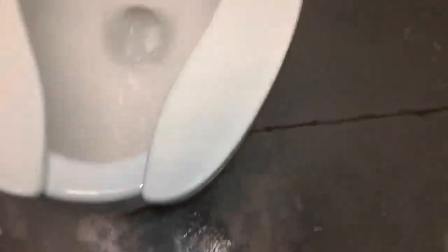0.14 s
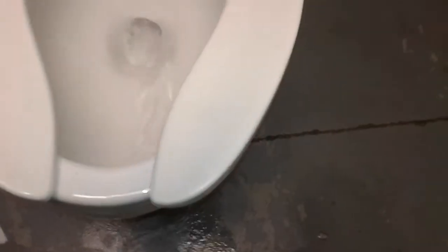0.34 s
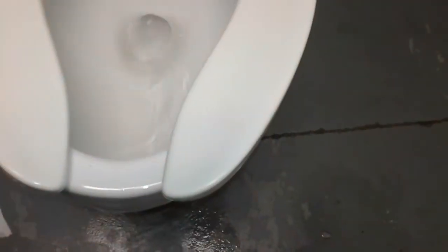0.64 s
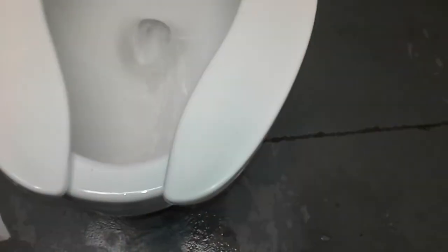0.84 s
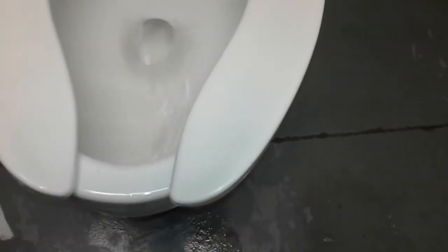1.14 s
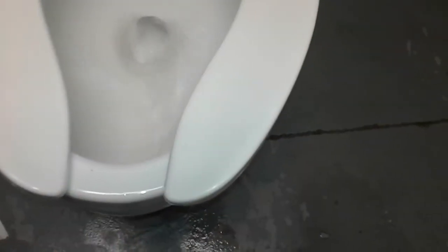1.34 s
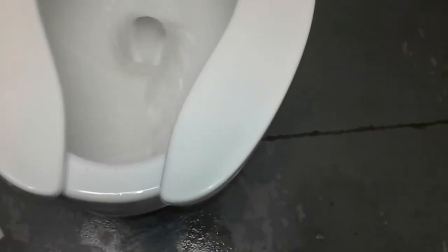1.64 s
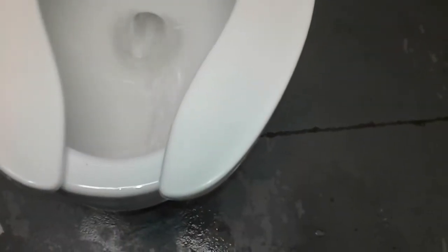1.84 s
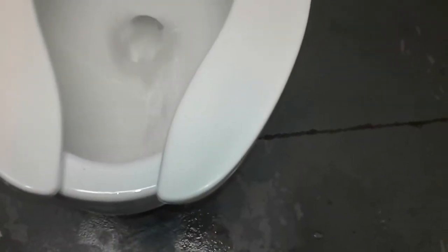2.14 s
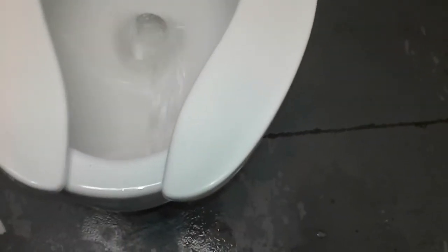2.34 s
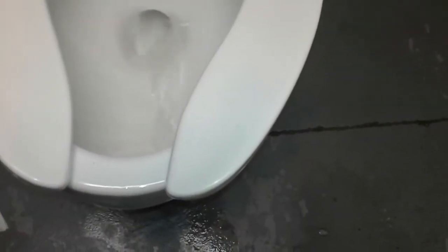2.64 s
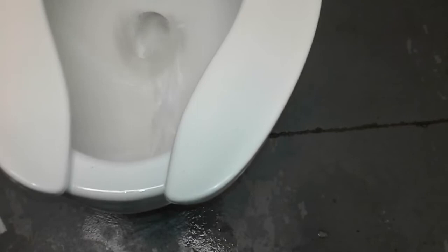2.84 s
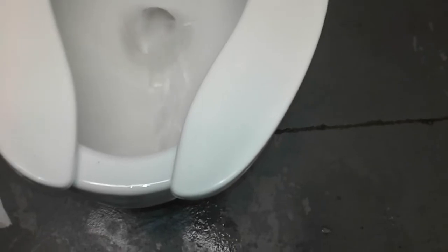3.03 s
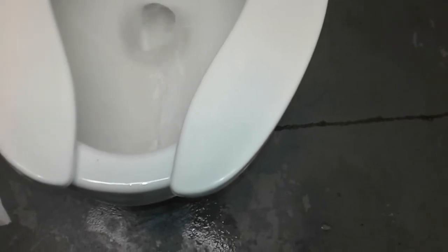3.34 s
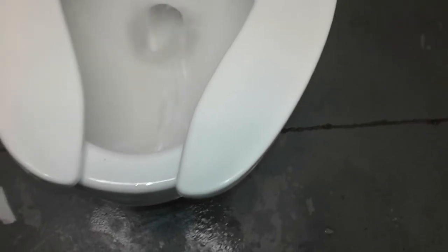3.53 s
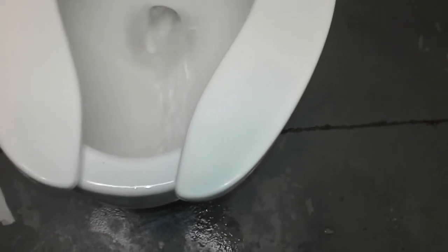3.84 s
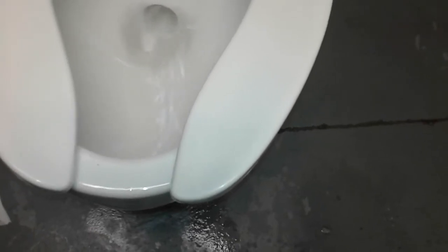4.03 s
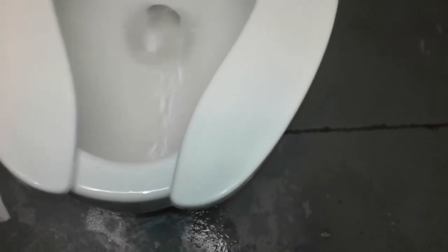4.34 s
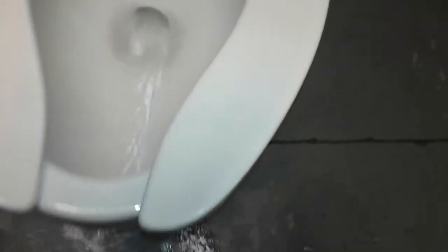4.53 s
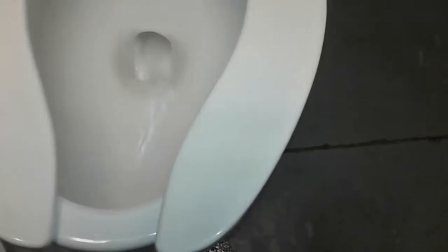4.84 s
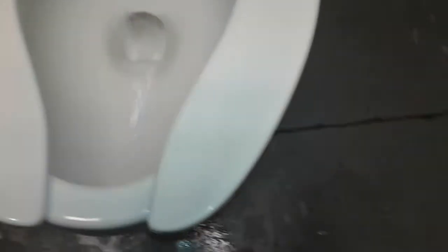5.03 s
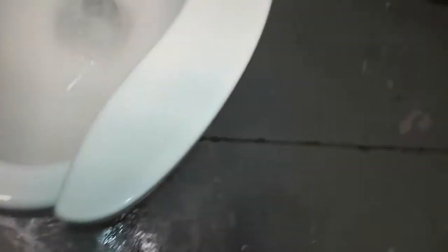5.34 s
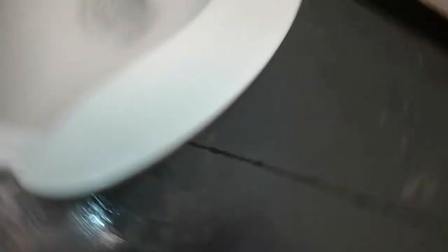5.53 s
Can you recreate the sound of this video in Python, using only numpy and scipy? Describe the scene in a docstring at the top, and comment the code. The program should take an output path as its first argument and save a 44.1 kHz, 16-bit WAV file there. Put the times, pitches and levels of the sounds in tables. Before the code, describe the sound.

The tail of a strong flush, heard from just over the bowl: steady hissing water full of crackling, airy spurts, splashes on porcelain and small wet gulps. It thins in stages, with spurts standing out more clearly and a loud spit just before the end. After about five seconds it drops to a near-quiet slosh, with short bright tile echo and very faint low rumble.

```python
"""A pressure-fed toilet flushes in a tiled restroom, with the microphone just above the bowl.
Aerated water hisses and sputters from the rim: coloured noise and volleys of tiny ringing bubbles.
It splashes in the bowl and gulps in the drain, as bursts and bubbles coloured by resonances.
The spurts weaken and thin out as the valve closes, with sharp spits among them.
The trap gives a last faint gulp and the water settles; tile echo, pipe hum and low rumble lie behind."""
import sys
import numpy as np
from scipy import signal
from scipy.fft import rfft, irfft, next_fast_len
from scipy.io import wavfile
from scipy.ndimage import map_coordinates

SR = 44100
rng = np.random.default_rng(int(sys.argv[2]) if len(sys.argv) > 2 else 0)


def wav_out(sig):
    """Save sig, one row per channel (or a flat mono array), as 16-bit PCM at SR to the path in sys.argv[1]."""
    wavfile.write(sys.argv[1], SR, np.round(np.clip(np.atleast_2d(sig).T, -1, 1) * 32767).astype(np.int16))


N = 251370
TIME = np.arange(N) / SR  # seconds

# Flow through the rim, dying as the valve closes. Each row: time in seconds, level in dB.
RIM_FLOW = [(0.0, -15.5), (1.3, -18), (1.62, -19.5), (2.81, -19), (3.19, -22.5), (3.41, -22.5),
            (3.59, -19.5), (3.76, -20.5), (4.51, -25), (5.03, -31.5), (5.27, -44), (5.7, -46.5)]
# How hard the water lands in the bowl. Each row: time in seconds, level in dB.
BOWL_POUR = [(0.0, -28), (0.3, -29), (0.7, -26.5), (1.14, -30), (1.65, -29), (1.95, -33), (2.87, -31.5),
             (3.21, -34), (3.4, -36.5), (3.73, -33), (4.97, -41), (5.3, -48), (5.7, -52.5)]
# Big spurts of air and water from the rim.
# Each row: start in seconds, relative level in dB, nominal length in seconds, ring pitch in Hz.
BIG_SPURTS = [(0.038, -15.5, 0.015, 6600), (0.188, -27, 0.026, 5900), (0.44, -17, 0.013, 4660),
              (0.486, -12, 0.02, 6000), (0.699, -11.5, 0.0096, 5730), (0.811, -12, 0.029, 6350),
              (1.1205, -9.5, 0.0047, 5670), (1.152, -12.5, 0.03, 6100), (1.21, -18, 0.012, 6260),
              (1.292, -13.5, 0.033, 6100), (1.403, -13.5, 0.06, 6150), (1.483, -14, 0.034, 6000),
              (1.757, -15, 0.0048, 5500), (1.781, -16.5, 0.008, 4800), (1.816, -21, 0.0063, 6500),
              (1.883, -14, 0.0098, 6060), (2.004, -13, 0.015, 5970), (2.201, -15.5, 0.026, 5250),
              (2.405, -14.5, 0.027, 5500), (2.319, -16, 0.03, 6600), (2.613, -15, 0.045, 6100),
              (2.675, -14, 0.016, 6250), (2.709, -23, 0.0077, 6750), (2.751, -14.5, 0.016, 5270),
              (2.845, -13.5, 0.027, 5840), (2.886, -17, 0.016, 5400), (2.9224, -13, 0.0061, 4700),
              (2.969, -13, 0.022, 5800), (3.054, -13, 0.005, 5400), (3.092, -16.5, 0.012, 5000),
              (3.198, -16.5, 0.032, 5330), (3.348, -12, 0.03, 5830), (3.415, -15, 0.038, 5800),
              (3.4814, -12.5, 0.0057, 5830), (3.523, -13, 0.0098, 6270), (3.574, -12, 0.017, 6500),
              (3.603, -11.5, 0.014, 6500), (3.705, -13, 0.022, 6560), (3.768, -11, 0.014, 6670),
              (3.8425, -11.5, 0.008, 5800), (3.858, -13, 0.015, 5900), (3.897, -19, 0.0047, 6100),
              (3.951, -14, 0.02, 6360), (4.042, -12.5, 0.033, 6000), (4.134, -15.5, 0.007, 5200),
              (4.161, -12, 0.022, 5900), (4.286, -13.5, 0.041, 6000), (4.391, -12.5, 0.012, 6080),
              (4.452, -13.5, 0.0065, 5540), (4.468, -12.5, 0.014, 6300), (4.577, -19.5, 0.017, 6560),
              (4.692, -20.5, 0.01, 5500), (4.73, -20, 0.01, 5900), (4.782, -20.5, 0.019, 6630),
              (4.911, -21.5, 0.0074, 6300), (5.012, -23, 0.0067, 6400), (5.106, -25, 0.066, 6100)]
# Single air pockets that burst. Each row: start in seconds, relative level in dB, pitch in Hz.
AIR_SPITS = [(3.4138, -6, 4650), (3.6853, -9, 5000), (4.66, -0.5, 5900), (4.7840, -7, 6400),
             (4.8906, -5, 4840)]
# Gulps and plops of air. Each row: start in seconds, relative level in dB, pitch in Hz,
# width in octaves, time to fall 60 dB in seconds.
AIR_GULPS = [(0.0, -16.5, 269, 0.25, 0.06), (.012, -26, 591, 0.57, 0.21), (.125, -33, 635, 0.7, 0.73),
             (0.22, -27.5, 397, 0.72, 0.29), (0.249, -29.5, 338, 0.59, 0.17), (.27, -26, 893, 0.47, 0.24),
             (0.299, -18.5, 3400, 0.15, 0.093), (0.302, -21.5, 2240, 0.42, 0.17),
             (.45, -31, 1943, 0.061, 0.95), (.62, -21.5, 2200, 0.7, 0.16), (1.57, -23.5, 2570, 0.25, 0.15),
             (1.715, -28, 1490, 0.9, 0.17), (3.5, -32.5, 526, 1.06, 0.23), (3.575, -31, 1865, 0.11, 0.35),
             (4.453, -19.5, 2910, 0.56, 0.074), (4.659, -36, 2310, 0.16, 0.26),
             (4.795, -30.5, 2700, 0.22, 0.19), (4.842, -35, 1230, 0.55, 0.091),
             (4.918, -32.5, 2390, 0.18, 0.18), (4.983, -28, 4260, 0.37, 0.089),
             (5.006, -37.5, 2720, 0.16, 0.2), (5.082, -35, 868, 1.64, 0.56),
             (5.42, -50.5, 548, 0.028, 0.69)]
# Soft low bumps. Each row: start in seconds, relative level in dB.
LOW_BUMPS = [(0.698, -35), (1.119, -44)]
# Swells of low rumble. Each row: time of the peak in seconds, its level in dB.
RUMBLE_SWELLS = [(0.0, -51), (3.52, -50.5), (5.2, -52), (5.56, -55)]
# Swells of the pipe's hum. Each row: time of the peak in seconds, its level in dB.
HUM_SWELLS = [(1.8, -49.5), (3.12, -58), (3.54, -51.5)]

# Resonances of the air in the bowl. Each row: frequency in Hz, width in Hz, relative strength in dB.
BOWL_MODES = [(902, 38, 5.5), (1288, 97, 6.5), (1438, 11, 7.5), (1920, 105, 4.5), (2310, 270, -2.5),
              (2828, 28, 1)]
# Resonances of the trap. Each row: frequency in Hz, width in Hz, relative strength in dB.
TRAP_MODES = [(253.5, 14.3, 1.5), (310, 53, -1.5), (457, 93, -2.5), (620, 19.4, 6)]
# Decay of the tiled room. Each row: frequency in Hz, time to fall 60 dB in seconds.
TILE_DECAY = [(150, 0.11), (1000, 0.68), (5000, 0.82), (12000, 0.033)]

# Spectra of rim hiss, mist, spurts, splash, drain, settling water and room rumble.
# Each row: frequency in Hz, relative level in dB per Hz.
HISS_SPECTRUM = [(1000, -40), (2500, -10), (3600, -9), (4400, -1.5), (5100, -1), (5750, 5.5), (6150, 9.5),
                 (6700, 4.5), (7300, -1.5), (8000, -10.5), (10000, -16.5), (13500, -38)]
MIST_SPECTRUM = [(5000, -22), (7500, 7), (9000, 3.5), (11000, -0.5), (12500, -4), (13800, -10.5)]
SPURT_SPECTRUM = [(1000, -62), (2500, -21.5), (3600, -13), (4400, -6), (5100, -3), (5750, 5), (6200, 5),
                  (6700, 3), (7300, -3.5), (8000, -9.5), (10000, -19), (13500, -30)]
SPLASH_SPECTRUM = [(300, -20), (700, -8.5), (1200, -8.5), (1650, -3), (2000, -0.5), (3000, 5), (4200, 3),
                   (7000, -45)]
DRAIN_SPECTRUM = [(40, -45), (120, -24), (190, -8.5), (240, -2), (400, -7), (700, -3.5), (1100, 2),
                  (2500, -49)]
SETTLE_SPECTRUM = [(120, -20), (210, -2.5), (330, 1), (450, -6), (560, -0.5), (1100, -6.5), (1450, -3),
                   (1800, -7), (4000, -29), (9000, -44)]
RUMBLE_SPECTRUM = [(20, -22), (38, -14), (58, -6), (90, -16), (200, -11), (600, -35)]

HISS_DB, MIST_DB = -0.5, -11  # hiss against the flow; offset of the mist
MIST_GROWS, MIST_FULL_DB = 1.093, -18.5  # mist dB per dB of flow; flow above which it grows no more
SPLASH_DB, SLAP_DB = -4, 3.5  # steady splash against the pour; a spurt's slap against that
DRAIN_DB, DRAIN_GROWS = -25.5, 0.61  # offset of the drain; its dB per dB of pour
SMALL_PER_S = 13  # small spurts a second, before those close to a big one are left out
SMALL_DB, SMALL_SCATTER_DB = -0.5, 5.5  # level against the flow; its scatter
SMALL_LENGTH_S, SMALL_HZ, SMALL_SCATTER_HZ = 0.015, 5900, 302  # typical length; ring; its scatter
SHUT_S = 5.08  # the valve shuts
TOP_HZ = 13900  # the recorder's band limit


def amp(db):
    """Decibels to gain."""
    return 10 ** (np.asarray(db) / 20)


def unit(x):
    """Scale to rms 1."""
    return x / np.sqrt(np.mean(x ** 2) + 1e-20)


def along(points, hz):
    """Read (Hz, value) points on a log frequency axis."""
    f, v = np.transpose(points)
    return np.interp(np.log(hz + 1), np.log(f + 1), v)


def flow_at(s):
    """The flow in dB at time s."""
    return np.interp(s, *np.transpose(RIM_FLOW))


def add(track, s, sound):
    """Mix a sound into a track at time s."""
    start = min(max(round(s * SR), 0), N)
    track[start:start + len(sound)] += sound[:N - start]


def wobble(rate):
    """A smooth random curve of rms 1, with rate knots a second."""
    knots = rng.standard_normal(N // 8)
    return unit(map_coordinates(knots, [TIME * rate], order=3, mode="wrap"))


def surges(rate, life_s, spread_db):
    """An envelope of rms 1: rate random surges a second, each starting at once and dying away."""
    chance, size = rng.random((2, N))
    power = (chance < rate / SR) * amp(spread_db * size) ** 2
    decay = np.exp(-2 / (life_s * SR))
    # run twice, so that the surges are already under way at the start
    running = signal.lfilter([1], [1, -decay], np.tile(power, 2))[N:]
    return unit(np.sqrt(running))


def swells(rows, rest_db, rise_s, fall_s):
    """A resting level from which each (s, peak dB) row rises and falls away."""
    peaks = 0
    for s, db in rows:
        distance = np.maximum((s - TIME) / rise_s, (TIME - s) / fall_s)
        peaks = peaks + amp(db) * np.exp(-distance)
    return np.hypot(amp(rest_db), peaks)


def coloured(x, gain):
    """Causal minimum-phase filter with the shape of gain; white noise keeps its power."""
    size = 2 * next_fast_len(len(x) // 2 + 8192)
    shape = unit(gain(np.fft.rfftfreq(size, 1 / SR)))
    cepstrum = irfft(np.log(shape + 1e-6))
    # folding the cepstrum onto positive time makes the filter causal
    cepstrum[1:size // 2] *= 2
    cepstrum[size // 2 + 1:] = 0
    return irfft(rfft(x, size) * np.exp(rfft(cepstrum)))[:len(x)]


def body(spectrum, modes=(), ring_db=0):
    """Gain of a broad spectrum with resonances standing on it."""
    def gain(f):
        peaks = sum(amp(db + ring_db) ** 2 / (1 + (2 * (f - hz) / width) ** 2)
                    for hz, width, db in modes)
        return amp(along(spectrum, f)) * np.sqrt(1 + peaks)
    return gain


def crackle(rate, life_s, spread_db):
    """Noise of rms 1 made of tiny bursts of unequal size."""
    return unit(rng.standard_normal(N) * surges(rate, life_s, spread_db))


def bubbles(count, low_hz, high_hz, cycles, spread_db):
    """A cloud of bubbles of rms 1; each rings for a few cycles and rises in pitch."""
    when, pitch, size = rng.random((count, 3)).T[:, :, None]
    hz = low_hz * (high_hz / low_hz) ** pitch
    n = np.arange(int(2 * SR * cycles / low_hz))
    age = n / SR * hz / cycles  # in decay lifetimes
    tone = np.sin(2 * np.pi * cycles * age * (1 + 0.032 * age))
    ring = tone * np.exp(-age) * (1 - np.exp(-8 * age))
    ring = ring * amp(spread_db * size) * np.sqrt(hz)
    places = (when * N).astype(int) + n
    return unit(np.bincount(places.ravel(), ring.ravel(), N)[:N])


def spray(flow_db, waver_db=1.33):
    """Aerated water hisses from the rim holes near 6 kHz in small surges, under a wavering mist."""
    cloud = bubbles(count=9000, low_hz=2978, high_hz=8810, cycles=7.3, spread_db=21)
    grains = unit(rng.standard_normal(N) + 0.5 * cloud)
    flutter = unit(np.hypot(.8, surges(rate=70, life_s=0.036, spread_db=0.5)))
    hiss = amp(flow_db + HISS_DB) * flutter * unit(coloured(grains, body(HISS_SPECTRUM)))
    mist_db = MIST_DB + MIST_GROWS * np.minimum(flow_db, MIST_FULL_DB) + waver_db * wobble(rate=12)
    fizz = coloured(crackle(rate=690, life_s=0.0092, spread_db=8), body(MIST_SPECTRUM))
    return hiss + amp(mist_db) * fizz


def choke(depth=0.19, gather_s=0.012):
    """Air gathering in the rim chokes the stream just before each big spurt."""
    blocked = np.zeros(N)
    plug = np.exp(-np.arange(SR // 20)[::-1] / (gather_s * SR))
    for s, *_ in BIG_SPURTS:
        add(blocked, s - len(plug) / SR, plug)
    return 1 - np.clip(depth * blocked, 0, .9)


def bowl_splash(pour_db, spurts, refill_s=4.77, rise=1.15, slap_t60=0.17, slap_grows=0.27):
    """Water hits porcelain and pool, each spurt with a slap; the bowl rings higher once it refills."""
    slaps, t = np.zeros(N), np.arange(SR // 5) / SR
    for s, db, *_ in spurts:
        slap_db = SLAP_DB + slap_grows * (db - flow_at(s))
        add(slaps, s, amp(slap_db - 60 * t / slap_t60))
    spatter = crackle(rate=230, life_s=0.016, spread_db=4.5)
    plinks = bubbles(count=3000, low_hz=882.0, high_hz=4070, cycles=9.7, spread_db=21)
    drops = unit(spatter + amp(-11.5) * plinks)
    pour = amp(pour_db + SPLASH_DB) * np.hypot(1, slaps) * drops
    empty = body(SPLASH_SPECTRUM, BOWL_MODES, ring_db=6.5)
    full = np.clip((TIME - refill_s) / 0.44, 0, 1)  # crossfade from empty to refilled
    return (1 - full) * coloured(pour, empty) + full * coloured(pour, lambda f: empty(f / rise))


def drain(pour_db):
    """Water churns and gurgles down the trap: bursts ringing its resonances, and low bubbles."""
    bursts = crackle(rate=150, life_s=0.022, spread_db=20)
    churn = unit(coloured(bursts, body(DRAIN_SPECTRUM, TRAP_MODES, ring_db=8.5)))
    gurgle = bubbles(count=400, low_hz=227.3, high_hz=902, cycles=7.0, spread_db=29)
    return amp(DRAIN_DB + DRAIN_GROWS * pour_db) * (churn + amp(-11) * gurgle)


def gulps(count=90, cycles=7, ring_db=-5, attack_cycles=1.34):
    """An air pocket collapses with a wet slap and a cluster of ringing bubbles around one pitch."""
    track, t = np.zeros(N), np.arange(SR // 2) / SR
    for s, db, hz, octaves, t60 in AIR_GULPS:
        fading = amp(-60 * t / t60) * (1 - np.exp(-t * hz / attack_cycles))
        band = lambda f: 1 / (1 + (np.log2((f + 1) / hz) / octaves) ** 4)
        slap = fading * coloured(rng.standard_normal(SR), band)[-len(t):]
        pitch = hz * 2 ** (octaves * rng.uniform(-1.1, 1, (count, 1)))
        # the bubbles are born one after another over half the decay
        born = t60 / 2 * (np.arange(count)[:, None] + rng.random((count, 1))) / count
        age = np.maximum(t[:int(.7 * t60 * SR)] - born, 0) * pitch / cycles
        tone = np.sin(2 * np.pi * cycles * age * (1 + 0.023 * age))
        ring = tone * np.exp(-age) * (1 - np.exp(-6 * age))
        cluster = (amp(-60 * born / t60) * ring).sum(0)
        strength = amp(db) * np.linalg.norm(fading)
        add(track, s, strength * slap / np.linalg.norm(slap))
        add(track, s, strength * amp(ring_db) * cluster / np.linalg.norm(cluster))
    return track


def ambience():
    """Faint low rumble in the room, which swells now and then."""
    low_cut = lambda f: 1 / np.sqrt(1 + (42 / (f + 1)) ** 8)
    boom = lambda f: amp(along(RUMBLE_SPECTRUM, f)) * low_cut(f)
    level = swells(RUMBLE_SWELLS, rest_db=-77, rise_s=.04, fall_s=0.11)
    return level * coloured(rng.standard_normal(N), boom)


def pipe_hum(hum_hz=127, width_hz=11):
    """The flow unsteadily excites one low resonance of the supply pipe."""
    mode = lambda f: 1 / (1 + (2 * (f - hum_hz) / width_hz) ** 2)
    level = swells(HUM_SWELLS, rest_db=-71, rise_s=0.048, fall_s=0.15)
    return level * unit(coloured(rng.standard_normal(N), mode))


def room(x):
    """The tiles answer 5 ms later with a tail in which each frequency dies at its own speed."""
    hz, t, z = signal.stft(rng.standard_normal(SR // 2), SR, nperseg=256)
    fading = amp(-60 * t / along(TILE_DECAY, hz)[:, None])
    tail = signal.istft(z * fading, SR, nperseg=256)[1]
    delayed = np.pad(x, (SR // 200, 0))
    return signal.fftconvolve(delayed, tail / np.linalg.norm(tail))[:N]


def rim_is_free(s, before_s=0.031, after_s=.025):
    """No small spurt escapes while a big one gathers or bursts."""
    return all(not start - before_s < s < start + after_s for start, *_ in BIG_SPURTS)


def small_spurts(count=130, regularity=2.5):
    """Spurts at uneven intervals that follow the flow, as rows like the big ones."""
    # a weighted sum of three random waits is more even than a single one
    waits = rng.exponential(size=(count, 3)) @ [regularity, 1, 1]
    s = np.cumsum(waits) / (regularity + 2) / SMALL_PER_S
    size, stretch, pitch = np.clip(rng.standard_normal((count, 3)).T, -2, 2)
    level_db = flow_at(s) + SMALL_DB + SMALL_SCATTER_DB * size
    length = SMALL_LENGTH_S * 2 ** (stretch / 2)
    rows = np.transpose([s, level_db, length, SMALL_HZ + SMALL_SCATTER_HZ * pitch])
    return [row for row in rows if row[0] < SHUT_S and rim_is_free(row[0])]


def spurt_shape(length, fall_s=0.0026, pop=0.87, pop_s=0.006):
    """A spurt starts with a pop, sags while it lasts and then collapses."""
    t = np.arange(SR // 10) / SR
    collapse = np.exp(-np.maximum(t - 1.52 * length, 0) / fall_s)
    return (1 + pop * np.exp(-t / pop_s)) * amp(-2.5 * t / length) * collapse


def sputter(spurts, rim_hz=6030):
    """Each spurt is a volley of tiny bursting bubbles ringing at its own pitch."""
    fizzle = bubbles(count=36000, low_hz=2284, high_hz=15000, cycles=2.95, spread_db=10.5)
    jets = np.zeros(N)
    for s, db, length, hz in spurts:
        shape = spurt_shape(length)
        ring = lambda f: amp(along(SPURT_SPECTRUM, f * rim_hz / hz))  # shifted to this pitch
        volley = shape * coloured(fizzle[int(s * SR):][:len(shape)], ring)
        add(jets, s, amp(db - 6.5) * volley * np.linalg.norm(shape) / np.linalg.norm(volley))
    return jets


def bumps(thud_hz=125, t60=0.031):
    """Short dull pushes: a low tone damped within a few cycles."""
    track, t = np.zeros(N), np.arange(SR // 8) / SR
    for s, db in LOW_BUMPS:
        add(track, s, amp(db + 6.5 - 60 * t / t60) * np.sin(2 * np.pi * thud_hz * t))
    return track


def spits(life_s=0.00028, crossing_s=0.0019, echo_db=-5):
    """A sharp spit flutters between the bowl's walls, weaker at each crossing."""
    track, t = np.zeros(N), np.arange(SR // 100) / SR
    burst = (t / life_s) ** 2 * np.exp(2 - 2 * t / life_s)
    for s, db, hz in AIR_SPITS:
        tone = np.sin(2 * np.pi * hz * t) + 0.29 * np.sin(2 * np.pi * 0.82 * hz * t)
        for bounce in range(3):
            level = amp(db + echo_db * np.sqrt(bounce) - 2)
            add(track, s + bounce * crossing_s, level * tone * burst)
    return track


def settling(slosh_db=-41, rest_db=-49, rise_s=0.048, fall_s=0.26):
    """Once the valve has shut the water sloshes in the trap and calms down to a faint level."""
    age = np.maximum(TIME - SHUT_S, 0)
    slosh = amp(slosh_db) * np.exp(-age / fall_s)
    level = np.minimum(age / rise_s, 1) * np.hypot(amp(rest_db), slosh)
    return level * coloured(crackle(rate=360, life_s=0.037, spread_db=14), body(SETTLE_SPECTRUM))


def scene():
    """All the water sounds in the restroom, with their echo, the hum, bumps and rumble."""
    flow_db = flow_at(TIME)
    pour_db = np.interp(TIME, *np.transpose(BOWL_POUR))
    spurts = list(BIG_SPURTS) + small_spurts()
    rim = sputter(spurts) + choke() * spray(flow_db) + spits()
    water = rim + bowl_splash(pour_db, spurts) + drain(pour_db) + gulps() + settling()
    echo = amp(-13) * room(water)
    return (water + echo + pipe_hum() + bumps() + ambience())[None]


def record(dry, ceiling=.72):
    """The recorder rounds off the highest peaks and keeps nothing above its band limit."""
    held = dry / (1 + np.abs(dry / ceiling) ** 6) ** (1 / 6)
    size = next_fast_len(N + SR // 4)
    passed = np.fft.rfftfreq(size, 1 / SR) < TOP_HZ
    return irfft(rfft(held, size) * passed, size)[..., :N]


dry = scene()
out = record(dry)
wav_out(out)
```